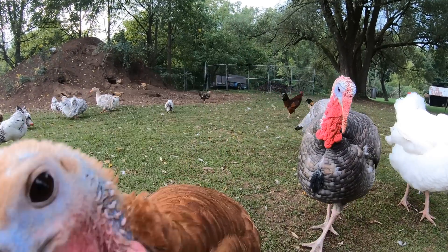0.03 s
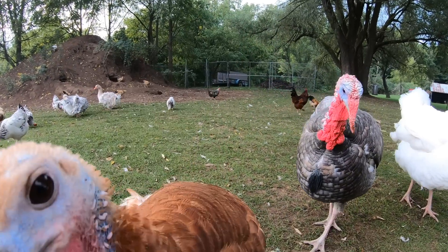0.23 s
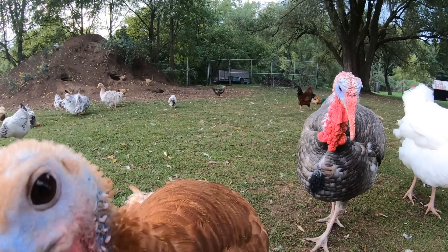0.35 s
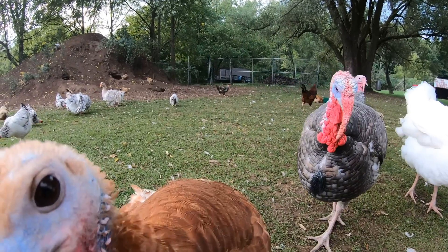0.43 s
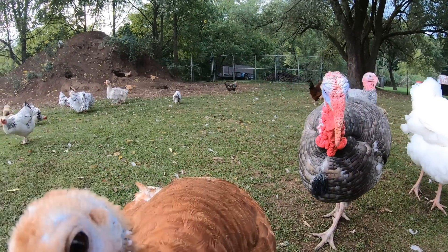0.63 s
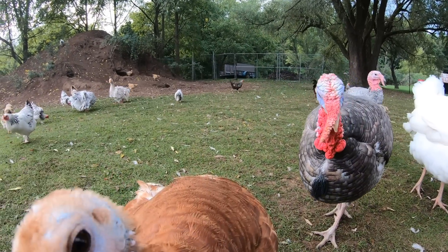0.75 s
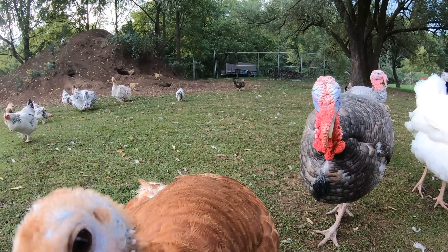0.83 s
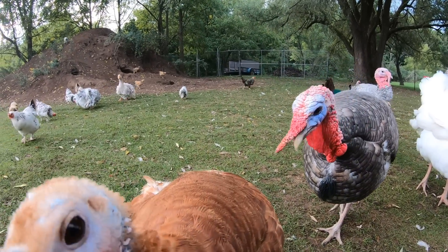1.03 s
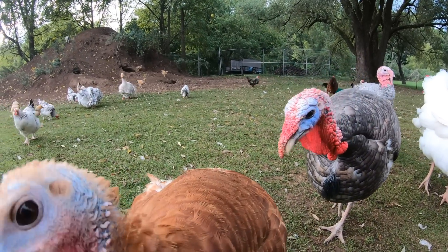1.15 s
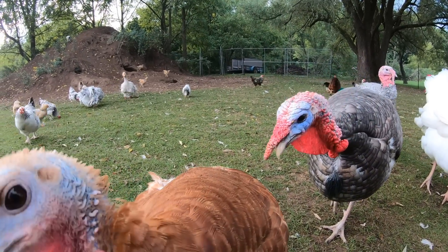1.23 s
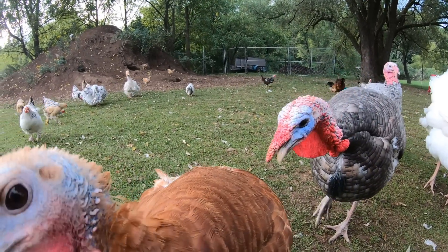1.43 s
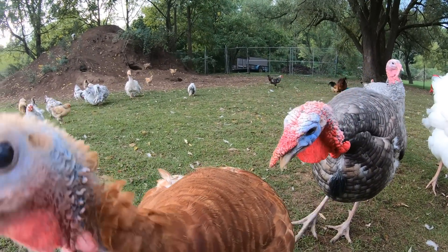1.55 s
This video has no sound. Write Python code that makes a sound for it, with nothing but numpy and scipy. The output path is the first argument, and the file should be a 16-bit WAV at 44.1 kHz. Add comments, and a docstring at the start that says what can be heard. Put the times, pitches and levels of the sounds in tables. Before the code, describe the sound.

Near turkey calls leap up, break and slide down within the first second, then stop. Around them a farm flock clucks and peeps softly, feathers brush, insects sizzle, and outdoor air rumbles low in stereo.

```python
"""A turkey close by, a little to the right, gives three yelps on a grassy farmyard: each leaps up, breaks
and slides down. Far birds peep, cluck and yelp, insects sizzle, and a low rumble and rustle lie below.
The turkey is a gliding tone with overtones that swell at throat resonances, plus rasping breath.
Peeps are gliding whistles and overtones, clucks ringing pulses, the far yelp three overtones of one glide.
Rumble, grass, feathers, insects and a wind puff are filtered noise; echoes and a tail add the open air."""
import sys
import numpy as np
from scipy import signal
from scipy.io import wavfile
from scipy.ndimage import uniform_filter1d, minimum_filter1d

SR = 44100
rng = np.random.default_rng(int(sys.argv[2]) if len(sys.argv) > 2 else 0)


def persist_wave(psi):
    """Save psi, clipped to +-1, as 16-bit WAV."""
    counts = np.round(np.clip(psi, -1, 1) * 32767).astype(np.int16)
    wavfile.write(sys.argv[1], SR, np.atleast_2d(counts).T)


def to_linear_factor(level_db):
    """Convert decibel levels (scalar or array-like) to linear amplitude factors."""
    exponent = np.asarray(level_db, float) / 20
    return 10 ** exponent


N = 70560
T = np.arange(N) / SR

# Low outdoor sound of the yard. Each row: frequency in Hz, relative strength in dB per Hz.
YARD_SPECTRUM = [(25, -30), (60, -4.5), (110, -4.5), (200, -2.5), (330, -13), (480, -40), (650, -16.5),
                 (900, -22), (1800, -28), (2500, -41.5), (5200, -34.5), (11000, -46.5), (13000, -68.5)]
# How alike left and right are. Each row: frequency in Hz, likeness from -1 (opposite) to 1 (same).
EAR_LIKENESS = [(60, 0.86), (140, 0.99), (340, 0.83), (800, -0.086), (1900, 0.16), (4520, 0.52),
                (10700, -0.7)]
# Colour of grass underfoot. Each row: frequency in Hz, relative strength in dB per Hz.
GRASS_SPECTRUM = [(600, 12), (1500, 2.5), (3000, 6.5), (6000, -14), (10000, -31), (12000, -51.5)]
# The flock moving in the grass. Each row: time in seconds, level in dB.
FLOCK_STIR = [(0, -73), (0.101, -63.5), (.5, -56.5), (.82, -60), (1, -57.5), (1.152, -59.5), (1.25, -82.5),
              (1.45, -66), (1.6, -60.5)]
# Feathers and feet brushing. Each row: middle in seconds, time from middle to silence in seconds,
# frequency in Hz around which the noise band is laid.
BRUSHES = [(.125, .035, 6000), (.19, .07, 5000), (.2, .04, 2500), (.358, .014, 9000), (.558, .02, 6000),
           (.558, .025, 2800), (.74, .055, 3400), (.98, .04, 2500), (1.49, .02, 1500), (1.55, .07, 230)]
# Level of each brush, in dB.
BRUSH_LEVELS_DB = [-60, -60.5, -56, -65.5, -65, -53.5, -59, -57.5, -62, -52]
# Low clucks. Each row: start in seconds, level of the first pulse in dB before it swells and dies,
# usual pitch in Hz.
CLUCK_CALLS = [(.178, -31, 470), (.544, -32.5, 338), (.59, -35, 459), (0.958, -35, 338), (.995, -41.5, 616),
               (1.081, -44.5, 544), (1.156, -42, 550), (1.185, -45, 594), (1.266, -35.5, 178),
               (1.27, -48, 594), (1.368, -41, 447), (1.378, -39, 224), (1.482, -31.5, 333),
               (1.531, -33, 316), (1.58, -35.5, 372)]
# Whistles of far peeps and their overtones, one gliding partial a row.
# Each row: start in seconds, length in seconds, first frequency in Hz, last frequency in Hz.
PEEP_PARTIALS = [(.094, .012, 2300, 2050), (.104, .011, 2750, 2650), (.112, .011, 2300, 2450),
                 (.121, .018, 2500, 1950), (.096, .028, 6850, 6900), (.104, .011, 5500, 5450),
                 (.112, .008, 4700, 4600), (.12, .015, 3900, 3300), (.335, .035, 2840, 2880),
                 (.388, .045, 2830, 2880), (.385, .055, 5660, 5700), (.796, .06, 2900, 2860)]
# Usual level of each partial, in dB.
PEEP_PARTIAL_LEVELS_DB = [-62, -59, -60, -62, -65, -61, -61, -61, -59, -58, -75, -65]
# Glide of a far hoarse yelp. Each row: time in seconds, pitch in Hz.
FAR_YELP_GLIDE = [(1.049, 862), (1.095, 811), (1.112, 715), (1.142, 506)]
# Echoes from the ground and a shed. Each row: delay in seconds on the left, strength in dB
# before the overall echo level.
ECHO_PATHS = [(.011, 2.5), (.047, -7)]
# The turkey's notes, one list a note. Each row: time in seconds, pitch in Hz, fundamental level in dB.
YELP_NOTES = [
    [(0.198, 661, -55), (0.202, 762, -38), (0.2144, 1102, -35.5), (0.2234, 1159, -44), (0.2309, 1206, -40),
     (0.2449, 1120, -80)],
    [(0.276, 1221, -61.5), (0.2855, 1120, -43.5), (0.2959, 1107, -45), (0.3199, 970, -41.5),
     (0.3249, 988, -58), (0.3269, 973, -40), (0.3309, 1018, -38.5), (0.3388, 922, -41),
     (0.3443, 892, -41.5), (0.3478, 1042, -37), (0.3538, 958, -34.5), (0.3618, 794, -44),
     (0.3658, 883, -65), (0.3688, 928, -35), (0.3783, 995, -34), (0.3847, 847, -36.5), (0.3922, 875, -35.5),
     (0.3952, 916, -46), (0.3977, 892, -39), (0.4012, 896, -32), (0.4067, 803, -33.5), (0.4207, 854, -33),
     (0.4341, 778, -35), (0.4521, 729, -33.5), (0.4631, 751, -37), (0.491, 647, -32.5), (0.5035, 567, -44),
     (0.508, 509, -45)],
    [(0.567, 647, -59), (0.569, 757, -25.5), (0.5725, 965, -29), (0.5745, 1145, -39), (0.576, 1160, -26.5),
     (0.5849, 1243, -25), (0.5869, 1570, -40.5), (0.5879, 1633, -33.5), (0.5939, 1633, -34),
     (0.6104, 1586, -54), (0.6189, 1646, -53), (0.6259, 1264, -36), (0.6308, 1207, -30),
     (0.6648, 996, -35.5), (0.6782, 820, -29.5), (0.7002, 724, -33.5), (0.7151, 548, -40),
     (0.7186, 450.0, -68)],
    [(0.773, 595, -44.5), (0.775, 730, -33), (0.778, 784, -26), (0.7854, 1103, -34.5), (0.7879, 1240, -22),
     (0.7944, 1302, -28), (0.7954, 1730, -28.5), (0.7959, 1702, -27), (0.8149, 1690, -59)],
    [(0.842, 1996, -56.5), (0.8534, 2040, -39.5), (0.8579, 2006, -45), (0.8624, 1712, -39.5),
     (0.8669, 1340, -35), (0.8704, 1306, -25.5), (0.8779, 1340, -26), (0.8834, 1253, -23),
     (0.8909, 1143, -29.5), (0.8983, 1177, -27.5), (0.9088, 1024, -30.5), (0.9138, 960, -33),
     (0.9178, 887, -29.5), (0.9283, 878, -27.5), (0.9462, 546, -37.5), (0.9537, 405, -61)],
]
# Windpipe and beak resonances, one list each for multiples 2, 3 and 4 of the pitch.
# Each row: frequency in Hz, strength against the fundamental in dB.
OVERTONE_RESONANCES = [
    [(1000, -16), (1280, -1), (1480, -10), (1620, -18), (1760, -29), (1930, -32), (2150, -7), (2330, -13),
     (2500, -31), (2670, -20), (3250, -12), (3400, -13), (4100, -22)],
    [(1800, -17), (2050, -28), (2400, -37), (2620, -31), (2850, -30), (3020, -22), (3140, -13), (3300, -20),
     (3520, -18), (3900, -42), (5000, -48)],
    [(2000, -22), (3050, -41), (3230, -27), (3500, -33), (3800, -44), (5000, -55)],
]
# Brightness of each note. Each row: boost of the second multiple in dB, of the higher multiples in dB.
NOTE_BRIGHTNESS = [(2, -12), (4, -3), (0, -1), (0, 2), (-2, 0)]
# Neck and beak raise the resonances in some notes. Each row: frequency factor for the second
# multiple, factor for the higher multiples.
NOTE_RESONANCE_SHIFT = [(1.07, 1), (1, 1.17), (1, 1), (1, 1), (1, 1)]
# The head turns between notes: left minus right of each fundamental, in dB.
NOTE_LEFT_RIGHT_DB = [-9.5, -8, -8.5, -7.5, -7]
# The pitch jumps up while the old tone rings out. Each row: time in seconds, level in dB.
VOICE_BREAKS = [(0.5856, -25), (0.794, -33)]


def at_hz(points, hz):
    """Reads a spectrum between its points, on a log-frequency axis."""
    p = np.array(points)
    return np.interp(np.log(hz), np.log(p[:, 0]), p[:, 1])


def drift(rate_hz):
    """Slow random wandering with spread 1, made by smoothing noise twice."""
    r = np.exp(-80 * np.pi * rate_hz / SR)
    # One value every 40 samples; the first 2000 let the smoothing settle.
    slow = signal.lfilter([1], [1, -2 * r, r * r], rng.standard_normal(N // 40 + 2002))[2000:]
    return np.interp(np.arange(N) / 40, np.arange(len(slow)), slow / slow.std())


def bump(centre, length):
    """A smooth swell and fade, silent beyond one length either side of the centre."""
    return np.cos(np.pi * np.clip((T - centre) / (2 * length), -.5, .5)) ** 2


def band(x, low_hz, high_hz, order=2):
    """Keeps mainly the part of a sound between two frequencies."""
    return signal.sosfilt(signal.butter(order, [low_hz, high_hz], "band", fs=SR, output="sos"), x)


def tone_phase(hz):
    """Adds up a changing pitch into the running phase of a tone."""
    return 2 * np.pi * np.cumsum(hz) / SR


def pan(x, db):
    """Places a sound by left minus right in dB, keeping the mean of both gains."""
    g = to_linear_factor(np.array([[db / 2], [-db / 2]]))
    return x * g / g.mean()


def noise(spectrum, patchy_db):
    """Third-octave bands of stereo noise, each with its level, flicker and likeness; rms 1."""
    out = 0
    edges = 22 * 2 ** np.arange(0, 9.5, 1 / 3)
    settle = 8000  # samples for the filters to settle
    white = rng.standard_normal((2, 2, N + settle))  # neighbouring bands take turns
    for k, (low, high) in enumerate(zip(edges, edges[1:])):
        mid, side = band(white[k % 2], low, high)[:, settle:]
        hz = np.sqrt(low * high)
        alike = np.clip(at_hz(EAR_LIKENESS, hz), -1, 1)
        level = to_linear_factor(at_hz(spectrum, hz) + patchy_db * drift(17.3))
        out = out + level * (np.sqrt(1 + alike) * mid + np.sqrt(1 - alike) * side * [[1], [-1]])
    return out / out.std()


def yard():
    """The low outdoor rumble: noise strongest in the bass, with a slight flicker in each band."""
    return to_linear_factor(-54) * noise(YARD_SPECTRUM, patchy_db=1.0)


def wind_thump():
    """One dull puff on the microphone: a short swell of bass noise."""
    centre_hz = 71.3
    puff = band(rng.standard_normal(N), centre_hz / 1.57, centre_hz * 1.34)
    return to_linear_factor(-45.5) * bump(.24, .05) * puff / puff.std()


def insects():
    """A narrow sizzle from the trees: high noise whose level flickers a little."""
    mid, side = band(rng.standard_normal((2, N)), 3840, 4550, order=3)
    stereo = mid + to_linear_factor(-9.5) * side * [[1], [-1]]
    return to_linear_factor(-69 + 2.0 * drift(10)) * stereo / mid.std()


def rustle():
    """The flock stirs in the grass as changing noise; feathers and feet add short narrow swells of noise."""
    s, db = np.transpose(FLOCK_STIR)
    out = to_linear_factor(np.interp(T, s, db)) * noise(GRASS_SPECTRUM, patchy_db=3.0)
    white = rng.standard_normal((2, N))
    for (s, length, hz), db in zip(BRUSHES, BRUSH_LEVELS_DB):
        brush = band(white, hz / 1.42, hz * 1.134)
        out = out + to_linear_factor(db) * bump(s, length) * brush / brush.std()
    return out


def clucks():
    """Each cluck is four uneven throat pulses, each ringing a low resonance at a pitch of its own."""
    pulse_gap_s, loss_per_pulse_db, t60_s = .006, 3.5, .03  # usual gap; t60: time to fall by 60 dB
    out = np.zeros(N)
    uneven = rng.uniform(-1, 1, (len(CLUCK_CALLS), 4, 2))
    for (s, db, hz), pulses in zip(CLUCK_CALLS, uneven):
        for k, (late, sharp) in enumerate(pulses):
            t = np.maximum(T - s - pulse_gap_s * k * (1 + .2 * late), 0)
            level = to_linear_factor(db - loss_per_pulse_db * k - 60 * t / t60_s) * (1 - np.exp(-t / .0015))
            out += level * np.sin(2 * np.pi * hz * (1 + .18 * sharp) * t)
    return out


def peeps():
    """Thin whistles of far birds and their overtones: gliding partials that waver and flicker together."""
    out = np.zeros(N)
    waver = 1 + 0.0046 * drift(37)
    flicker_db = 5.0 * drift(70)
    for (s, length, from_hz, to_hz), db in zip(PEEP_PARTIALS, PEEP_PARTIAL_LEVELS_DB):
        u = np.clip((T - s) / length, 0, 1)  # runs from 0 to 1 during the partial
        swell = np.abs(np.sin(np.pi * u)) ** 0.34 * (u < 1)
        hz = (from_hz + (to_hz - from_hz) * u ** 1.9) * waver
        out += np.sqrt(2) * to_linear_factor(db + flicker_db) * swell * np.sin(tone_phase(hz))
    return out


def far_yelp():
    """Multiples three to five carry this far; each flickers, more as the call falls away."""
    throat_hz, fall_db_per_khz = 3220, 16  # multiples near the throat resonance carry best
    s, hz = np.transpose(FAR_YELP_GLIDE)
    u = np.clip((T - s[0]) / (s[-1] - s[0]), 0, 1)
    pitch = np.interp(T, s, hz) * (1 + 0.0055 * drift(85))
    phase = tone_phase(pitch)
    tones = 0
    for k in range(3, 6):
        loss_db = fall_db_per_khz * np.abs(k * pitch - throat_hz) / 1000
        hoarse_db = 1.5 * (1.0 + u) * drift(70)
        tones = tones + to_linear_factor(-52 - loss_db + hoarse_db) * np.sin(k * phase)
    return np.abs(np.sin(np.pi * u)) ** .4 * (u < 1) * tones


def trees(x):
    """Far calls scatter among the trees into a diffuse dying tail, another in each ear."""
    t = T[:SR // 2]
    t60_s = 0.92
    tail = rng.standard_normal((2, len(t))) * to_linear_factor(-60 * t / t60_s) * (t > .006)
    tail = tail / np.sqrt((tail ** 2).sum(1, keepdims=True))
    return to_linear_factor(-11.5) * signal.fftconvolve(x[None], tail, axes=1)[:, :N]


def yard_echo(x):
    """Two short outdoor reflections, later on the right and with opposite signs in the two ears."""
    out = np.zeros((2, N))
    for k, (s, db) in enumerate(ECHO_PATHS):
        for side in range(2):
            lag = int(s * SR * (1 + 0.36 * side))
            out[side, lag:] += to_linear_factor(db) * x[:-lag] * (-1) ** (k + side)
    return to_linear_factor(-36) * out


def flutter_swell_db(level_db, pitch):
    """As the long note flutters, its second multiple swells in the throat and carries through the catches."""
    ring_hz, ring_width_hz, ring_db = 1764, 136, 21.5
    # The held level bridges short dips of the fundamental.
    held_db = minimum_filter1d(-minimum_filter1d(-level_db, size=500), size=500)
    ring = ring_db * np.exp(-((2 * pitch - ring_hz) / ring_width_hz) ** 2)
    return (held_db - level_db + ring) * bump(.37, .055) ** .5


def rasp(glide, phase, breath):
    """Breath noise rasps in the throat while the pitch moves fast, pulsing with the tone."""
    full_hz_per_s = 87000  # slide speed that gives the full rasp
    speed = uniform_filter1d(np.abs(np.gradient(glide)), size=200) * SR
    slide = np.minimum(speed / full_hz_per_s, 1)
    return to_linear_factor(-38) * slide * (1 + np.sin(phase)) * breath / breath.std()


def break_ring(at, ring_db, phase, pitch):
    """At a voice break the old tone rings on at the pitch it had and dies away fast."""
    t60_s = .016
    i, t = int(at * SR), np.maximum(T - at, 0)
    level = np.sqrt(2) * to_linear_factor(ring_db - 60 * t / t60_s) * (1 - np.exp(-t / 0.00065))
    return level * np.sin(phase[i] + 2 * np.pi * pitch[i] * t)


def turkey():
    """A membrane tone; its overtones light up as they pass the windpipe resonances; fast slides rasp."""
    out = 0
    wobble = 1 + 0.005 * drift(110)
    # Level flicker in dB of the fundamental, second multiple and higher multiples.
    shimmer = [1 * drift(27), 2.0 * drift(73), 4.2 * drift(39)]
    breath = band(rng.standard_normal(N), 1500, 3870)
    notes = zip(YELP_NOTES, NOTE_BRIGHTNESS, NOTE_RESONANCE_SHIFT, NOTE_LEFT_RIGHT_DB)
    for rows, (second_db, higher_db), (second_up, higher_up), pan_db in notes:
        s, hz, db = np.transpose(rows)
        glide = uniform_filter1d(np.interp(T, s, hz), size=60)
        pitch = glide * wobble
        phase = tone_phase(pitch)
        edge = np.clip(np.minimum(T - s[0], s[-1] - T) / 0.0055, 0, 1)  # fades in and out
        level_db = uniform_filter1d(np.interp(T, s, db), size=80)

        resonance_db = at_hz(OVERTONE_RESONANCES[0], 2 * pitch / second_up)
        boost_db = second_db + flutter_swell_db(level_db, pitch) + shimmer[1]
        upper = to_linear_factor(boost_db + resonance_db) * -np.cos(2 * phase)
        for k, table in enumerate(OVERTONE_RESONANCES[1:], 3):
            resonance_db = at_hz(table, k * pitch / higher_up)
            upper = upper + to_linear_factor(higher_db + shimmer[2] + resonance_db) * np.sin(k * phase)
        upper = upper + rasp(glide, phase, breath)

        level = np.sqrt(2) * edge * to_linear_factor(level_db + shimmer[0])
        out = out + pan(level * np.sin(phase), pan_db)
        out = out + pan(level * upper, -7)  # overtones share one place for all notes
        for at, ring_db in VOICE_BREAKS:
            if s[0] < at < s[-1]:
                out = out + pan(break_ring(at, ring_db, phase, pitch), pan_db)
    # A faint tone between the multiples as the long note flutters.
    between = np.sin(tone_phase(1400 * wobble))
    return out + to_linear_factor(-56.5) * bump(.35, 0.026) * between


def scene():
    """Near turkey with its echoes, far birds with their tail among the trees, and the yard around them."""
    voice = turkey()
    birds = peeps() + far_yelp()
    far = yard() + rustle() + insects() + clucks() + wind_thump()
    near = voice + yard_echo(voice.mean(axis=0))
    return near + pan(birds, -2.2) + trees(birds) + pan(far, -1.2)


def low_pass(x):
    """Removes everything above the highest recorded frequency."""
    return signal.sosfilt(signal.butter(12, 11320, fs=SR, output="sos"), x)


def record(dry):
    """Turns the finished mix into the sound that is heard."""
    return low_pass(dry)


dry = scene()
out = record(dry)
persist_wave(out)
```